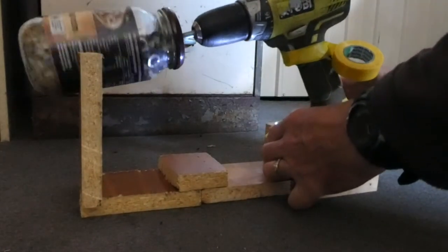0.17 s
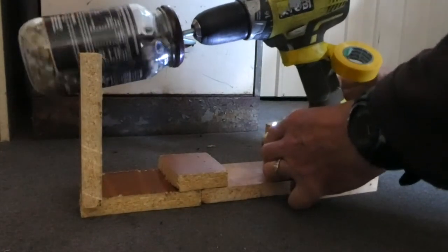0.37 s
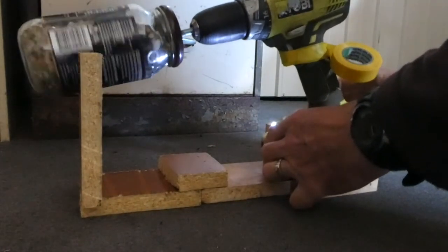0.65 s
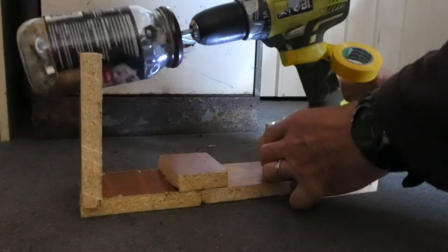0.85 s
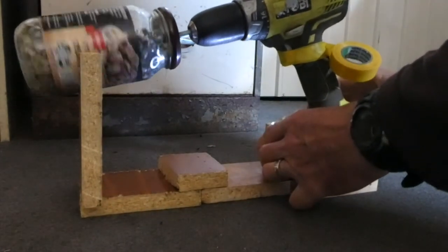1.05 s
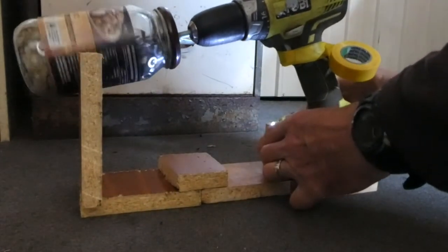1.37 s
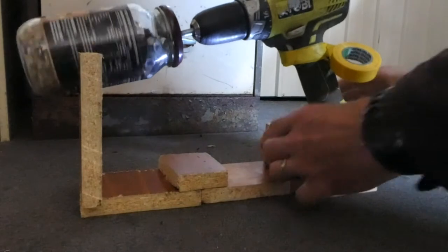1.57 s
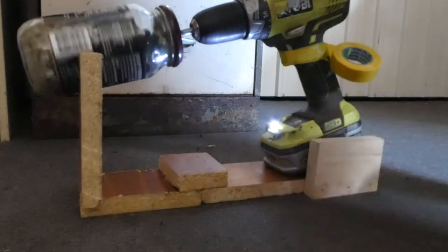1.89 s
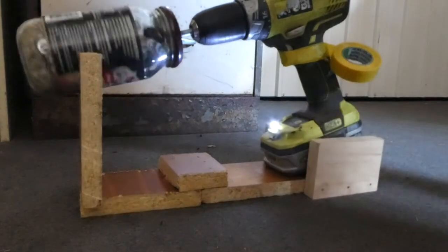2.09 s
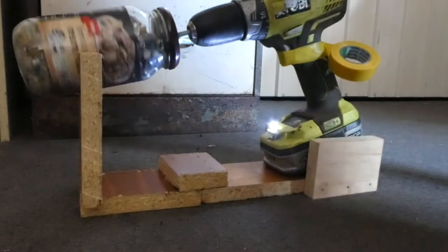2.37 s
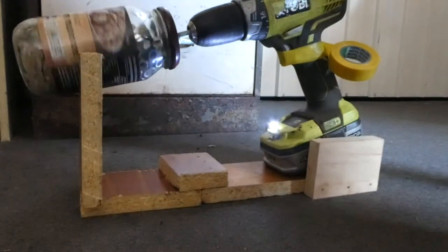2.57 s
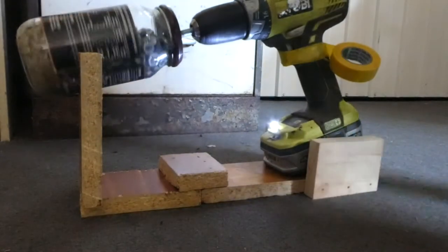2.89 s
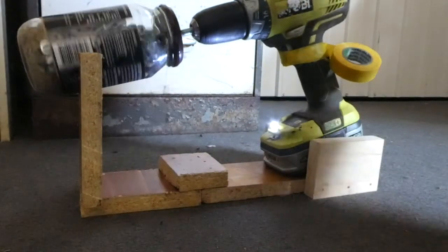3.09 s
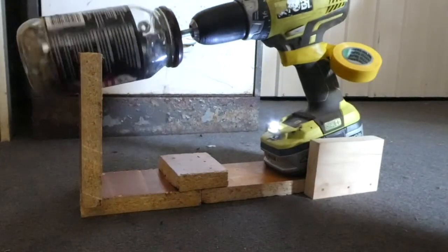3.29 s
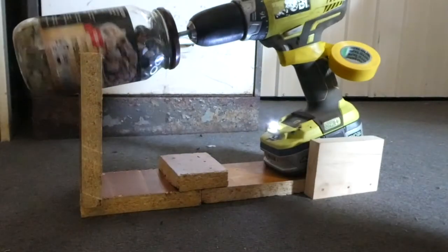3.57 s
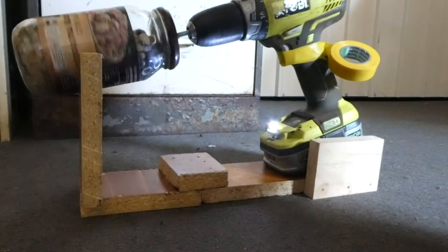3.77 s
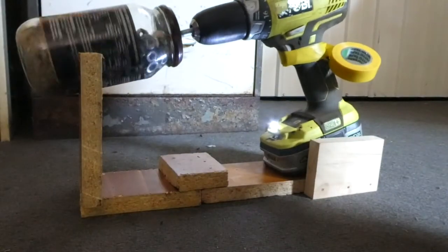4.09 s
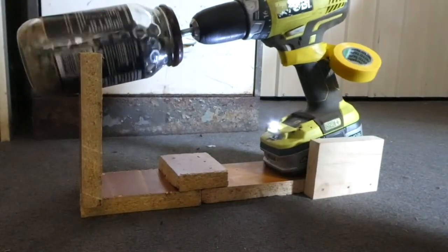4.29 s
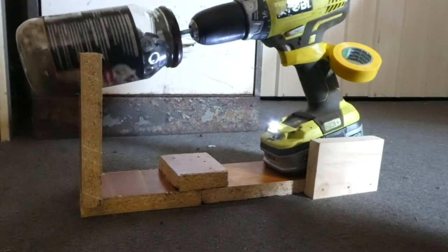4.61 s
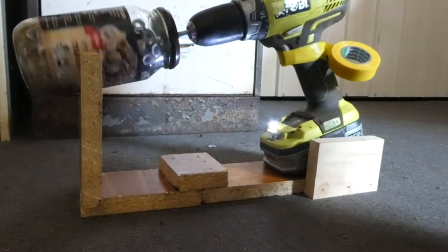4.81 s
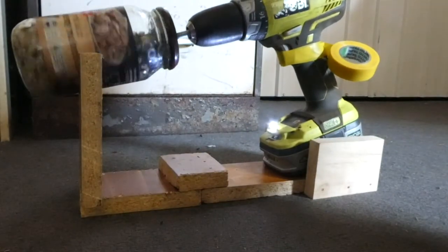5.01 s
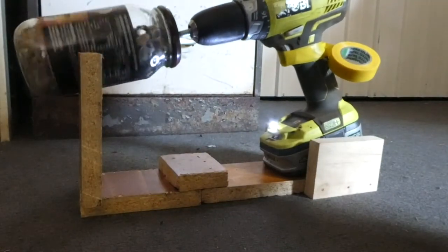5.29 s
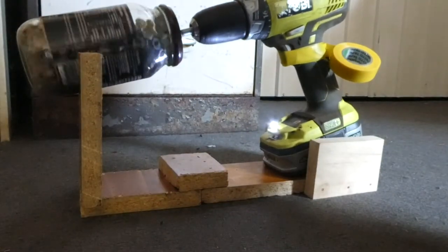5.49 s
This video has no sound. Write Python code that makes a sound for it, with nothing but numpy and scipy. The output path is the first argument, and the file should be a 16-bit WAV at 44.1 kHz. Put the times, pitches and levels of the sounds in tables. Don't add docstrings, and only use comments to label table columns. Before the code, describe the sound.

From 0 to about 5.6 seconds, already running at the start and cut off while still going, a cordless drill turns a glass jar of stones, bolts and washers. The load slides back roughly three times a second, each slide a grainy swell of tiny ticks topped by irregular hard clacks: bright bolt hits, duller stone knocks, thin washer ticks. All ring only for hundredths of a second, mid to high, with no bass. Strong clacks bunch near 0.7-1.4, 1.8 and 2.6-2.8 seconds; around 3-4 it is somewhat sparser with isolated hits, then a dense, loud burst comes near 5.05-5.4. Far quieter beneath, the motor gives a wavering rough mid-low hum, a thin whine around 5.5 kHz and brush and fan hiss. Faint low jolts fall near 1.05, 2.85, 3.1 and 3.6. The sound is close and bright, with a short, faint workshop echo.

```python
import sys
import numpy as np
from scipy import signal
from scipy.fft import irfft
from scipy.io import wavfile

SR = 44100
rng = np.random.default_rng(int(sys.argv[2]) if len(sys.argv) > 2 else 0)


def volts(x):
    e = np.asarray(x, float) / 20
    return 10 ** e


def unload_wav(signal):
    wavfile.write(
        sys.argv[1],
        SR,
        np.round(np.clip(np.atleast_2d(signal).T, -1, 1) * 32767).astype(np.int16),
    )


N = 249157


def rms_one(x):
    return x / np.sqrt(np.mean(x ** 2) + 1e-20)


def in_time(rows):
    s, value = np.transpose(rows)
    return np.interp(np.arange(N) / SR, s, value)


def at_hz(points, hz):
    point_hz, value = np.transpose(points)
    return np.interp(np.log(hz), np.log(point_hz), value)


def drift(rate):
    r = np.exp(-80 * np.pi * rate / SR)
    slow = signal.lfilter([1], [1, -2 * r, r * r], rng.standard_normal(N // 40 + 2002))
    slow = slow[2000:]
    return np.interp(np.arange(N) / 40, np.arange(len(slow)), rms_one(slow))


def workshop(x):
    t60_s = 0.2
    size = 1 << 14
    hz = np.arange(size // 2 + 1) * SR / size
    t60 = t60_s / (1 + hz / 9000)
    lags = rng.uniform(0.003, 0.01, (2, 6, 1))
    loop = volts(-60 * lags / t60) * np.exp(-2j * np.pi * hz * lags)
    signs = (-1.) ** np.arange(6)[:, None]
    response = np.sum(loop / (1 - loop) * signs, axis=1)
    return signal.fftconvolve(x[None], irfft(response, size), axes=1)[:, :N]


# frequency in Hz, level in dB per Hz.
MOTOR_SPECTRUM = [(30, -15.5), (130, -9), (290, -5.5), (450, -4), (600, -4.5), (1000, -6), (1700, 0.5),
                  (3500, -0.5), (6000, -23), (11500, -33), (13000, -34), (16000, -26)]
# frequency in Hz, left-right likeness (1 is the same in both).
LIKENESS = [(60, -0.031), (125, -0.075), (300, -0.23), (600, 0.28), (1200, 0.64), (4000, 1), (14000, 0.97)]


def motor_noise():
    noise = np.zeros((2, N))
    edges = 22 * 2 ** np.arange(0, 10, 0.5)
    white = rng.standard_normal((2, 2, N))
    for k, (low, high) in enumerate(zip(edges, edges[1:])):
        centre = np.sqrt(low * high)
        band = signal.butter(2, [low, high], "band", fs=SR, output="sos")
        mid, side = signal.sosfilt(band, white[k % 2])
        alike = np.clip(at_hz(LIKENESS, centre), -1, 1)
        gain = volts(at_hz(MOTOR_SPECTRUM, centre) + 3.2 * drift(27))
        noise += gain * (np.sqrt(1 + alike) * mid + np.sqrt(1 - alike) * side * [[1], [-1]])
    return volts(-42.5) * rms_one(noise)


def tooth_whine():
    whine_hz, whine_db = 5466, -45.5
    cycles = np.cumsum(whine_hz * (1 + 0.00052 * drift(3.7))) / SR
    return volts(whine_db + drift(25)) * np.sin(2 * np.pi * cycles)


# time in seconds, level in dB.
HUM_LEVEL = [(0.0, -57.5), (0.08, -51), (0.17, -54), (0.25, -48.5), (0.3, -55), (0.66, -55.5),
             (0.96, -51.5), (1.9, -54), (2.0, -53.5), (2.71, -50.5), (2.97, -54.5), (3.55, -53.5),
             (3.65, -60), (3.7, -54.5), (4.44, -55.5), (5.0, -50), (5.65, -55.5)]
# centre in Hz, width in Hz, level in dB.
GEAR_BANDS = [(206.5, 10, -18), (246.2, 9, -19), (369.4, 15, -10), (453, 92, -2), (772, 95, -1),
              (1222, 107, 3)]
# frequency in Hz, level in dB.
MOTOR_TONES = [(419, -3), (464, .5)]


def gear_hum():
    hum = np.zeros((2, N))
    for hz, width_hz, level_db in GEAR_BANDS:
        r = np.exp(-np.pi * width_hz / SR)
        poles = [1, -2 * r * np.cos(2 * np.pi * hz / SR), r * r]
        mid, side = signal.lfilter([1, 0, -1], poles, rng.standard_normal((2, N)))
        hum += volts(level_db) * rms_one(mid + 0.41 * side * [[1], [-1]])
    turns = np.cumsum(1 + 0.007 * drift(2.9)) / SR
    for hz, level_db in MOTOR_TONES:
        phase = 2 * np.pi * hz * turns + np.array([[0.3], [-0.3]])
        hum += volts(level_db + 1.9 * drift(9)) * np.sin(phase)
    return volts(in_time(HUM_LEVEL)) * hum * volts([[0.6], [-0.6]])


def drill():
    return gear_hum() + tooth_whine() + motor_noise()


# time in seconds, level in dB.
THUMPS = [
    (1.05, -52),
    (2.84, -60),
    (3.085, -53.5),
    (3.6, -53.5),
]


def thumps():
    out, t = np.zeros(N), np.arange(900) / SR
    for s, peak_db in THUMPS:
        start = int(s * SR)
        out[start:start + len(t)] += volts(peak_db) * t / 0.001 * np.exp(1 - t / 0.0019)
    return out


# time of the peak in seconds, patter level in dB, half length in seconds.
SLIDES = [(0.0, -38, 0.13), (0.214, -32, 0.077), (0.49, -36.5, 0.14), (0.906, -43.5, 0.11),
          (1.218, -33.5, 0.048), (1.497, -35, 0.076), (1.844, -32, 0.067), (2.25, -30, 0.099),
          (2.462, -44.5, 0.027), (2.624, -34, 0.088), (2.89, -37, 0.11), (3.175, -34, 0.088),
          (3.532, -37, 0.043), (3.723, -38, 0.032), (3.872, -33.5, 0.068), (4.195, -31.5, 0.079),
          (4.49, -41, .05), (4.799, -32, 0.074), (5.062, -27.5, 0.055), (5.261, -31.5, 0.022),
          (5.434, -40, 0.095)]


def sliding_db():
    resting_db = -38
    t = np.arange(0, N + 64, 64) / SR
    s, peak_db, half_s = np.transpose(SLIDES)[..., None]
    swell = volts(resting_db) + np.sum(volts(peak_db) * np.exp(-((t - s) / half_s) ** 2), axis=0)
    return np.interp(np.arange(N) / SR, t, 20 * np.log10(swell))


# frequency in Hz, scatter as a share of it, t60 in seconds, level in dB.
RINGS = [(1716, 0.054, 0.018, -39), (2309, 0.056, 0.015, 0), (3392, 0.057, 0.016, -0.5),
         (4390, 0.076, 0.017, -5), (5233, 0.039, 0.015, 1.5), (6390, 0.1, 0.018, -3),
         (8163, 0.037, 0.016, 0), (9420, 0.073, 0.015, -2), (11190, 0.046, 0.015, -4),
         (13800, 0.1, 0.021, -24), (14600, 0.044, 0.0075, -14)]


def strike(times, family_db, clean, lead_s, ring=1):
    out = np.zeros((2, N))
    at = np.minimum((times * SR).astype(int), N - 1)
    signs = rng.choice([-1, 1], (len(at), len(RINGS)))
    white = rng.standard_normal((2, 2, N))
    for k, (hz, scatter, t60, level_db) in enumerate(RINGS):
        blow = volts(family_db[:, k] + level_db)
        sizes, cracks = np.full(N, 1e-12), np.zeros(N)
        np.add.at(sizes, at, blow)
        np.add.at(cracks, at, blow * signs[:, k])
        tail = signal.lfilter([1], [1, -volts(-60 / (ring * t60 * SR))], sizes)
        lead = 0.5 * signal.lfilter([0, 1], [1, -np.exp(-1 / (lead_s * SR))], sizes[::-1])[::-1]
        reach = SR / (8 * scatter * hz)
        mid, side = white[k % 2] * (tail + lead) * np.sqrt(reach)
        side = side * (0.05 + 0.98 * (hz / 14000) ** 2)
        drive = mid + clean * reach * cracks + side * [[1], [-1]]
        edges = [hz * (1 - 1.44 * scatter), hz * (1 + 2.24 * scatter)]
        out += signal.sosfilt(signal.butter(2, edges, "band", fs=SR, output="sos"), drive)
    return out * volts([[0.5], [-0.5]])


# level in dB, in the order of the ring families.
PATTER_DB = [-15, -7.5, -3, -3, -3.5, -2, -4.5, -0.5, -9.5, -11.5, -24]


def patter(slide_db, per_s, uneven_db):
    times = rng.random(int(per_s * N / SR)) * N / SR
    size_db = uneven_db * np.minimum(rng.exponential(1, (len(times), 1)), 2.5)
    ring_level_db = np.transpose(RINGS)[3]
    colour_db = rng.normal(0, 1.9, (len(times), len(RINGS))) + PATTER_DB - ring_level_db
    ticks = strike(times, size_db + colour_db, clean=2.3, lead_s=0.00012, ring=0.95)
    return volts(slide_db + 1.37) * rms_one(ticks)


def pings(times, family_db, count, size):
    out = np.zeros(N + size)
    t = (np.arange(size) - 30) / SR
    hz, scatter, t60, level_db = np.repeat(np.transpose(RINGS), count, axis=1)[:, :, None]
    pitch, strength, lag = np.moveaxis(rng.random((len(times), len(hz), 3)), -1, 0)[..., None]
    decay_db = -60 * np.maximum(t, 0) / (0.57 * t60) + 65000 * np.minimum(t, 0)
    mode_db = np.repeat(family_db, count, axis=1)[..., None] + level_db + 5.1 * (strength - 1.5)
    mode_hz = hz * (1 + 1.5 * scatter * (2 * pitch - 1))
    modes = volts(mode_db + decay_db) * np.cos(2 * np.pi * mode_hz * t + 3.6 * (lag - 0.5))
    for start, push in zip((times * SR).astype(int) - 26, np.sum(modes, axis=1)):
        out[start:start + size] += push
    return out[:N]


SPOT_SCATTER_DB = 1.5
# start in seconds, upper ring in dB, middle and low ring in dB relative to the upper.
STONES = [(0.0609, -11.5, -2, 3.5), (0.1098, -16, 2, 2), (0.4306, -14.5, 4, 0), (0.7318, -15.5, 8, 2),
          (0.7625, -11, 0, -2), (0.9923, -14, -1.5, 2), (1.0186, -15, 3.5, 12.5), (1.208, -11, -7, -9),
          (1.3047, -11, 1.5, -4), (1.4144, -7, -5, -4), (1.7921, -8, -15, 1.5), (1.8121, -9, 0, 4.5),
          (1.8342, -7.5, -5, -1), (1.86, -19, 0, 0), (2.3163, -16.5, 5.5, 0.5), (2.6129, -7.5, 1.5, -1.5),
          (2.6277, -16, 3, 0), (2.6459, -14.5, 5, 0), (2.6993, -12, -4, 1.5), (2.742, -14, 2, 1),
          (2.839, -10, 7.5, 1), (3.9573, -15.5, 12, -3), (4.4622, -15, 8, -9), (5.0581, -11, 3, -3),
          (5.0922, -13.5, -13, 0.5), (5.1103, -15.5, 6.5, -4), (5.3375, -11.5, -8, 0),
          (5.3448, -10, -3.5, 0), (5.4676, -11, -3, -1.5), (5.5985, -19.5, 10, 11)]
# start in seconds, upper ring in dB, middle ring in dB relative to the upper.
BOLTS = [(0.1424, -18, -7), (0.5359, -20, 11), (0.5455, -14.5, 3), (0.5687, -23, 8), (0.6999, -17, 7),
         (0.813, -15.5, 2), (1.0495, -18.5, 9), (1.0995, -17, 5.5), (1.6961, -19, 5.5), (1.908, -21.5, 7),
         (2.0211, -18.5, 3.5), (2.136, -20.5, 5), (2.2562, -16, -4), (2.2922, -22, -3), (2.383, -20.5, 1),
         (2.565, -16, -1), (3.0887, -16.5, 2), (3.2945, -16.5, 5.5), (3.599, -13.5, 7.5),
         (4.2234, -18.5, -1), (4.2638, -18.5, 3), (4.297, -17.5, 3), (4.315, -18.5, 3), (4.414, -18.5, 3),
         (4.4494, -18.5, 5.5), (4.5763, -18, 2), (4.9629, -16.5, 1.5), (5.2377, -21.5, 12.5),
         (5.2547, -14, 2), (5.4137, -20.5, 3)]
# start in seconds, upper ring in dB, middle ring in dB relative to the upper.
PEBBLES = [(0.2783, -10.5, -3), (0.2857, -19, 6), (1.1549, -17.5, 3), (1.4168, -17.5, 11),
           (1.4879, -13.5, 2.5), (1.5906, -17, 6), (1.7259, -12.5, 1), (1.8873, -13.5, 5),
           (2.1965, -13.5, -4), (2.2438, -10.5, -9.5), (2.338, -27.5, 6), (2.4222, -16, 6),
           (2.5789, -17, 5), (2.638, -14.5, -9), (2.8935, -11.5, -4), (3.318, -10, 0), (3.5276, -10, 0),
           (3.8507, -9, 1), (4.0896, -15, 8), (4.1552, -15, 3), (4.2554, -19, 0), (4.4807, -10.5, -1),
           (4.7643, -10, 2), (4.8096, -15, 1), (5.0363, -11.5, 5.5), (5.0634, -10.5, 5),
           (5.1755, -14.5, -6), (5.2157, -13.5, -5), (5.3978, -10.5, 0), (5.5112, -12, 1.5)]
# start in seconds, upper ring in dB.
KNOCKS = [(0.079, -14), (0.2139, -14), (0.4123, -25), (0.5554, -18.5), (0.73, -14), (0.8797, -16),
          (1.3342, -18), (1.3942, -15.5), (1.4494, -28), (1.4578, -16), (1.5474, -19.5), (1.9514, -18),
          (2.4911, -17), (2.5045, -17), (2.5593, -17), (2.6775, -19), (2.768, -16), (2.8731, -17),
          (2.9257, -17.5), (2.969, -20.5), (3.3056, -12.5), (3.408, -17.5), (3.686, -17), (3.994, -19),
          (4.0225, -19), (4.5157, -15), (4.9836, -13.5), (5.0465, -19), (5.381, -16.5), (5.5189, -17)]
# start in seconds, upper ring in dB.
WASHERS = [(0.0902, -17), (0.1731, -18), (0.3565, -19), (0.5652, -16.5), (0.7869, -17.5), (0.8479, -19),
           (0.8935, -18), (0.954, -20), (1.067, -35), (2.051, -22.5), (2.0655, -19.5), (2.6002, -20),
           (3.0023, -24), (3.0466, -27), (3.0814, -17), (3.1306, -18), (3.342, -25.5), (3.47, -19.5),
           (3.547, -18.5), (3.7904, -16), (3.979, -22), (4.122, -19), (4.1915, -19), (4.3917, -23.5),
           (4.6976, -20.5), (4.7859, -21), (5.0544, -27), (5.3196, -29), (5.434, -18.5), (5.625, -27.5)]
# start in seconds, upper ring in dB.
CHIPS = [(0.369, -20), (0.644, -34), (0.7364, -15), (0.741, -27), (0.8035, -24), (0.8162, -20),
         (0.9843, -19.5), (0.9873, -29), (1.1998, -22), (1.2186, -22), (1.2329, -22), (1.5076, -23),
         (1.6627, -25.5), (1.8959, -20), (2.2398, -18), (2.8294, -22), (3.1392, -28), (3.2448, -21),
         (3.2642, -29), (3.5327, -25), (3.5648, -25), (3.645, -20), (3.749, -24), (3.8903, -24.5),
         (4.1358, -20), (4.2136, -26), (4.2727, -20), (4.7136, -23.5), (4.742, -20), (5.4535, -20)]


def drops(slide_db, count):
    kinds = [(STONES, -2.4, -4.5), (BOLTS, -5.5, 5.5), (PEBBLES, -9, -1),
             (KNOCKS, -4, -6), (WASHERS, -3, 5), (CHIPS, -4.5, 4)]
    listed = []
    for table, low_db, bright_db in kinds:
        for row in table:
            blow = np.pad(np.array(row, float), (0, 5 - len(row)))
            listed.append(blow + [0, 0, 0, low_db, bright_db])
    listed = np.array(listed)
    listed[:, 3:] += SPOT_SCATTER_DB * rng.standard_normal((len(listed), 2))
    at = rng.integers(0, N, count)
    loose_db = -31.5 + 0.47 * (slide_db[at] - slide_db.mean())
    strays = np.column_stack([at / SR, loose_db, 0 * at, 0 * at - 5., 0 * at + 6.])
    strays[:, 1:] += 5 * np.clip(rng.standard_normal((count, 4)), -2, 1)
    return np.vstack([listed, strays]).T


def clacks(slide_db):
    s, upper_db, middle_db, low_db, bright_db = drops(slide_db, count=110)
    colour = [low_db, low_db, middle_db, middle_db / 2, 0 * s, bright_db / 2] + 5 * [bright_db]
    spot_db = SPOT_SCATTER_DB * rng.standard_normal((len(s), len(RINGS)))
    family_db = upper_db[:, None] + np.transpose(colour) + spot_db
    rough = strike(s, family_db, clean=0.068, lead_s=0.00045)
    return volts(-13.5) * rough + volts(-2.5) * pings(s, family_db, count=3, size=600)


def scene():
    bounce_s, bounce_db, room_db = 0.00205, -31, -21.5
    slide_db = sliding_db()
    jar = clacks(slide_db) + patter(slide_db, per_s=600, uneven_db=4.0)
    jar = signal.sosfilt(signal.butter(3, 1500, "high", fs=SR, output="sos"), jar)
    lag = int(bounce_s * SR)
    bounce = volts(bounce_db) * np.array([np.roll(jar[0], lag), np.roll(jar[1], lag + 1)])
    near = (jar + bounce) * volts([[0.55], [-0.55]])
    return near + volts(room_db) * workshop(jar.mean(axis=0)) + drill() + thumps()


def roll_off(x):
    return signal.sosfilt(signal.butter(12, 15850, fs=SR, output="sos"), x)


def record(dry):
    bent = np.tanh(dry) - dry
    rounded = dry + signal.sosfilt(signal.butter(2, 500, "high", fs=SR, output="sos"), bent)
    mix = signal.sosfilt(signal.cheby2(10, 50, 16800, fs=SR, output="sos"), rounded)
    return roll_off(mix)


dry = scene()
out = record(dry)
unload_wav(out)
```